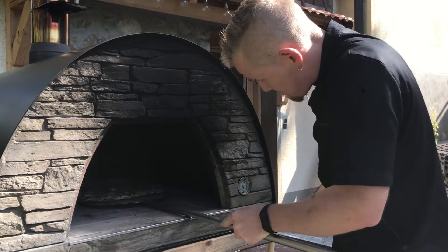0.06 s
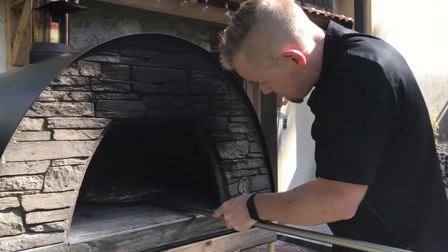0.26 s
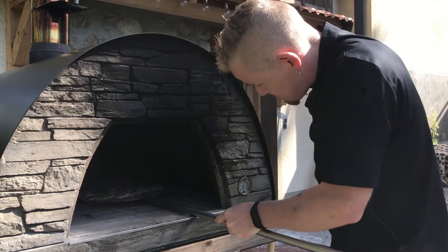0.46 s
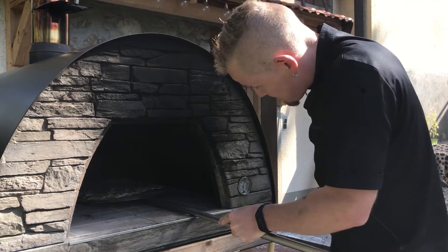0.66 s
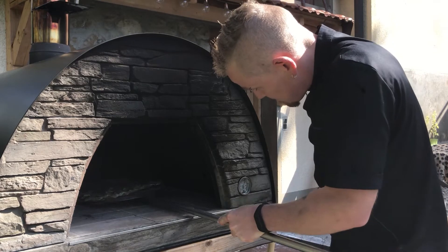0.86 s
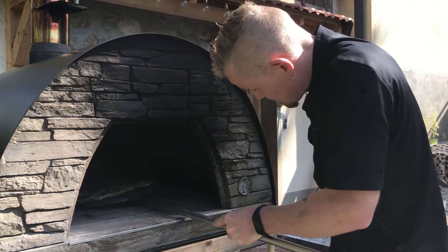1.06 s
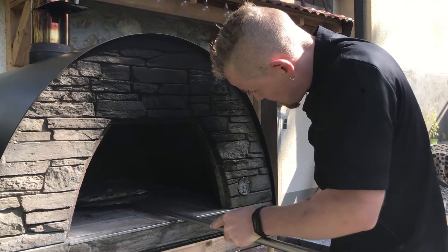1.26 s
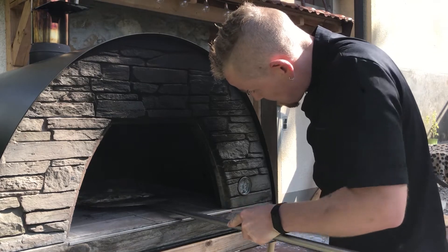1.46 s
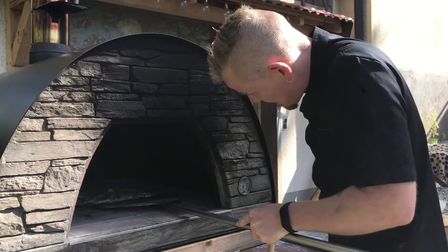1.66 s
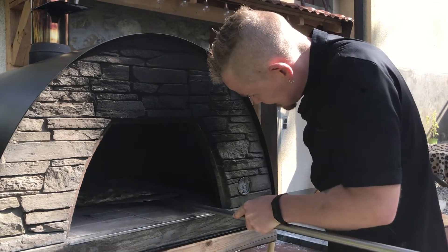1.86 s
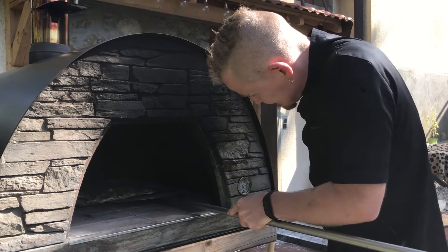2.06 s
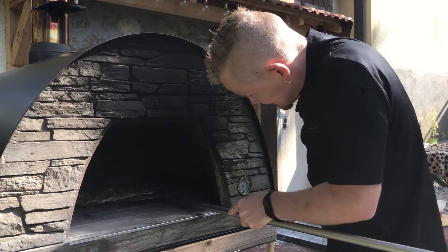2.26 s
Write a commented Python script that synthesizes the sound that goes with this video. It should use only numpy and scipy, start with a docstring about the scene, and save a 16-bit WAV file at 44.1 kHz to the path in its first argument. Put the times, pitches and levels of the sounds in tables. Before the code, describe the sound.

A metal peel rasps on the gritty stone floor of a wood-fired oven: one loud short stroke, a near pause, several quick strokes, then a softer slide; close, fairly dry, with faint low hum outdoors.

```python
"""From the start a metal peel rustles on the gritty stone floor of a wood-fired oven, then strokes loudly at 0.25 s.
After a faint rustle come strokes near 1.0, 1.15 and 1.5 s, a softer slide from 1.7 s and a last rustle from 2.1 s.
Dense clicks of grit drive the blade's damped modes; the contact point wanders, so the colour shifts.
From 0.26 s on, single resonances of peel or dome sing out when pushed by noise; a short echo of noise fills the dome.
Throughout, the draught hums, wavering, in two low resonances of the dome, over shaped noise of quiet outdoor air."""
import sys
import numpy as np
from scipy import signal
from scipy.fft import rfft, irfft
from scipy.io import wavfile
from scipy.ndimage import uniform_filter1d

SR = 44100
rng = np.random.default_rng(int(sys.argv[2]) if len(sys.argv) > 2 else 0)


def master_out(mix):
    """Clip the mix to full scale and print it as 16-bit PCM to the path in sys.argv[1]."""
    frames = np.transpose(np.atleast_2d(mix))
    ceiling = np.clip(frames, -1, 1)
    pcm = np.round(ceiling * 32767).astype(np.int16)
    wavfile.write(sys.argv[1], SR, pcm)


N = 103635  # length [samples]
T = np.arange(N) / SR  # time [s]
F = np.maximum(np.arange(N // 2 + 1) * SR / N, 1)  # frequency [Hz], kept above zero for logarithms

# Loudness of the slide, one list per group of strokes or rustle: (time [s], level [dB])
STROKE_LEVELS = [
    [(0, -45), (.014, -49), (.086, -66), (.158, -56.5), (.182, -67.5), (.19, -59)],
    [(.2, -51.5), (.213, -37.5), (.222, -30), (.253, -21), (.275, -25), (.291, -30), (.301, -23.5),
     (.317, -26), (.343, -43.5), (.4, -60)],
    [(.42, -56), (.428, -48), (.44, -52.5), (.472, -56), (.54, -65), (.575, -61.5), (.59, -55.5),
     (.62, -59), (.712, -69), (.892, -69.5), (.93, -66.5)],
    [(.95, -58), (.992, -46.5), (1.004, -34.5), (1.02, -31), (1.045, -31), (1.075, -34.5), (1.11, -45)],
    [(1.118, -37.5), (1.125, -31.5), (1.148, -28.5), (1.162, -33), (1.18, -27.5), (1.211, -31),
     (1.255, -37.5), (1.29, -54.5), (1.33, -67)],
    [(1.37, -55), (1.414, -36), (1.446, -25.5), (1.475, -28.5), (1.5, -25.5), (1.52, -28), (1.545, -28),
     (1.56, -26.5), (1.595, -30.5), (1.625, -32.5), (1.65, -37.5), (1.676, -44)],
    [(1.7, -43), (1.74, -39), (1.75, -37), (1.8, -39), (1.82, -36.5), (1.87, -36.5), (1.895, -35.5),
     (1.94, -37.5), (1.978, -41), (2.02, -36), (2.06, -39), (2.114, -45)],
    [(2.125, -50), (2.145, -64), (2.183, -55.5), (2.227, -66), (2.247, -53.5), (2.289, -42), (2.32, -49),
     (2.335, -51), (2.35, -65)],
]
# Colour of the slide as the contact point wanders:
# (time [s], extra weight under 1 kHz [dB], extra ring near 1.6 kHz [dB], extra treble [dB])
CONTACT_COLOUR = [(0, 5, -9.5, -1), (.07, 7, 8, 0), (.19, 15, 7, 7.5), (.22, -1, -2.5, -1),
                  (.26, -4, -3, 1.5), (.31, 0, 2.5, -1.5), (.38, 6, 2.5, -3.5), (.43, -12, 4.5, 5),
                  (.52, 16, 8, -7.5), (.59, 11, 7, -1.5), (.78, 0, 3.5, -12.5), (.94, 7, 7.5, -3),
                  (1.01, -2, 3, -9), (1.05, -9, 1, -1.5), (1.11, 19.5, 13, 2.5), (1.14, -6, 0, 4.5),
                  (1.24, 3, -0.5, -4), (1.33, 3, 4.5, -2.5), (1.41, 2, -1.5, 8.5), (1.47, 6.5, -4, 5),
                  (1.53, 5, 2.5, 6), (1.62, 10, 10, 5.5), (1.68, 9, 8.5, 1.5), (1.77, -8, 7.5, 6),
                  (1.85, -3, 0, 4), (1.9, -8.5, 1, -3), (2.07, 4.5, 2.5, -2), (2.18, -1, 8.5, -4),
                  (2.29, 11, -1, 5), (2.35, 11, 0, 7)]
# Frequencies between which the colour changes are interpolated: (frequency [Hz])
COLOUR_KNOTS_HZ = [650, 1600, 4000, 10000]
# Mean spectrum of the slide before its colour shifts: (frequency [Hz], relative level [dB])
SCRAPE_SPECTRUM = [(120, -59.5), (200, -17.5), (415, -25), (640, -22.5), (760, -15), (950, -11),
                   (1130, -4.5), (2620, 0), (4000, -0.5), (5700, 2), (6500, -4.5), (9300, 0), (10000, -8.5),
                   (11800, -11.5), (12500, -6), (14000, -9), (15700, -11)]
# Modes of the blade damped by the stone:
# (frequency [Hz], level before a rise with root frequency [dB], 60 dB decay time [s])
BLADE_MODES = [(560, -12, .08), (1087, -10.5, 0.21), (1306, -1, 0.098), (1567, -7.5, .06), (1750, -9, 0.21),
               (2160, 0, 0.033), (2289, 1.5, 0.15), (2596, -17.5, .04), (2800, -5.5, 0.018),
               (3091, -0.5, 0.12), (3583, -8, 0.09), (4160, -4.5, 0.01), (4646, -13, 0.019),
               (5567, -15, 0.045), (7760, -11.5, 0.004), (8796, -9, 0.004)]
# Level of the lower hum over time, random wavering of narrow noise: (time [s], level [dB])
HUM_LOW_LEVELS = [(0.0, -44), (0.05, -56), (0.08, -77), (0.13, -56.5), (0.99, -62.5), (1.05, -48.5),
                  (1.09, -66), (1.12, -53.5), (1.5, -65), (1.56, -50), (1.6, -66), (1.7, -56.5),
                  (1.75, -64), (1.79, -52), (1.83, -56), (2.01, -62), (2.03, -48), (2.26, -68.5),
                  (2.31, -52.5), (2.35, -59)]
# Level of the upper hum over time, wavering of narrow noise: (time [s], level [dB])
HUM_HIGH_LEVELS = [(0.0, -48.5), (0.24, -69), (0.44, -55.5), (0.46, -45), (0.56, -66), (0.61, -46.5),
                   (0.75, -78), (0.84, -54), (0.95, -67.5), (1.14, -49.5), (1.16, -62), (1.23, -42.5),
                   (1.37, -80), (1.42, -49.5), (1.47, -62), (1.54, -44), (1.56, -63), (1.7, -47.5),
                   (1.72, -59), (1.98, -58), (2.01, -82), (2.04, -42), (2.06, -38), (2.17, -67),
                   (2.26, -43.5), (2.35, -50.5)]
# Spectrum of the outdoor floor: (frequency [Hz], relative level [dB])
AIR_SPECTRUM = [(40, -42), (70, -21.5), (100, -3), (135, -12.5), (208, -14), (330, -18.5), (470, -22.5),
                (800, -32), (2000, -34.5), (4000, -56), (8000, -57), (10500, -66), (13000, -44),
                (15700, -61)]
# Slow rise and dip of the outdoor floor: (time [s], level change [dB])
AIR_SWELL = [(0, 0), (.6, 3.5), (.74, -4.5), (.9, 0), (1.8, 3), (2.35, 1)]
# Resonances of peel or dome that sing out:
# (time [s], length of the push [s], peak level [dB], frequency [Hz], 60 dB decay time [s])
KNOCKS = [(.26, 0.016, -27.5, 2880, 0.034), (0.301, 0.013, -38.5, 867, 0.051),
          (.312, 0.016, -41.5, 530, 0.067), (1.49, 0.037, -38, 790, 0.037), (.31, 0.0093, -45.5, 259, 0.13),
          (0.434, .007, -44.5, 1255, 0.096), (.452, 0.0063, -53, 1370, 0.07),
          (.46, 0.014, -51.5, 312, 0.049), (.515, 0.026, -53.5, 800, 0.032), (.53, 0.03, -56.5, 567, 0.027),
          (.545, 0.023, -50, 376, 0.099), (.965, .015, -51, 1680, .03), (1.051, 0.033, -26, 5600, 0.016),
          (1.06, 0.032, -44, 2740, 0.049), (1.14, 0.013, -29, 1496, 0.041),
          (1.15, 0.016, -25.5, 2620, 0.055), (1.148, 0.011, -20.5, 3520, 0.012),
          (1.467, 0.0082, -26.5, 1303, 0.03), (1.566, 0.011, -31.5, 1184, 0.027),
          (1.59, 0.019, -45, 500, 0.055), (1.59, 0.021, -47, 248, 0.13), (1.618, 0.01, -31.5, 1097, 0.13),
          (1.63, 0.029, -28, 2114, .05), (1.754, 0.0068, -32.5, 1760, 0.11),
          (1.83, 0.029, -38.5, 1700, .07), (1.78, 0.018, -31.5, 2250, 0.046),
          (1.894, 0.026, -34.5, 1705, 0.043), (2.29, 0.023, -51, 1136, 0.054)]

GRAINS_PER_S, GRAIN_SCATTER_DB = 12000., 2  # scatter: mean excess of a grain's level
JUDDER_DB, JUDDER_PER_S = 0.27, 70.  # level spread; fresh levels per second
WANDER_DB, WANDER_PER_S = 4., 22.  # the same, for the drive of each mode
PATCHY_DB, PATCHY_PER_S = 1, 20.  # the same, for each half-octave band
BLADE_DB = -20.5  # all blade modes, beside direct grit at 0 dB
SHEET_LOW_HZ, SHEET_HIGH_HZ = 2477, 15090
SHEET_T60_S, SHEET_DB = 0.033, -19.5  # decay up to 6 kHz, shorter above; level beside direct grit
HUM_LOW_HZ, HUM_LOW_WIDTH_HZ = 107, 8  # width of one pass
HUM_HIGH_HZ, HUM_HIGH_WIDTH_HZ = 167.2, 19
AIR_DB = -59  # before the slow swell
DOME_T60_S, DOME_DB = .16, -22
BOTTOM_HZ, TOP_HZ = 66, 15830


def undb(db):
    """Amplitude ratio by the definition of the decibel."""
    return 10 ** (np.asarray(db) / 20)


def unit(x):
    """Normalisation to a root-mean-square value of 1."""
    return x / np.sqrt(np.mean(x ** 2))


def curve(rows, column=1):
    """Linear interpolation in time of one column of a table."""
    rows = np.array(rows)
    return np.interp(T, rows[:, 0], rows[:, column])


def walk(rate):
    """Smoothed random levels: held 1 / rate s, slewed by two moving averages, spread near 1."""
    hold = int(SR / rate)
    steps = np.repeat(rng.standard_normal(N // hold + 1), hold)
    return 1.47 * uniform_filter1d(uniform_filter1d(steps, hold), hold)[:N]


def colour(x, spectrum):
    """Linear filtering by a spectrum interpolated over log frequency; rms 1."""
    hz, db = np.array(spectrum).T
    gain = undb(np.interp(np.log(F), np.log(hz), db, left=-90))
    return unit(irfft(rfft(x) * gain, N))


def ring(x, hz, t60):
    """Damped resonance: one complex pole gives a sinusoid with exponential decay."""
    pole = np.exp(2j * np.pi * hz / SR - np.log(1000) / (t60 * SR))
    return signal.lfilter([1], [1, -pole], x).imag


def grit():
    """Random impulse excitation: uneven grains click, with a level judder for stick and slip."""
    chance, sign, size = rng.random((3, N))
    hits = (chance < GRAINS_PER_S / SR) * np.sign(sign - .5)
    clicks = hits * undb(-GRAIN_SCATTER_DB * np.log(size + 1e-4))
    return unit(clicks) * undb(JUDDER_DB * walk(JUDDER_PER_S))


def wandering_mode(grains, hz, t60):
    """Modal excitation varies with position: the drive of one mode drifts with the contact point."""
    return unit(ring(grains * undb(WANDER_DB * walk(WANDER_PER_S)), hz, t60))


def blade(grains):
    """Modal superposition: the blade's stone-damped modes add, each driven by the grit."""
    return sum(undb(db) * np.sqrt(hz / 2000) * wandering_mode(grains, hz, t60)
               for hz, db, t60 in BLADE_MODES)


def sheet(grains, count=70):
    """High modal density: a crowd of close sheet modes rings at chance pitches."""
    places = (np.arange(count) + rng.random(count)) / count
    pitches = SHEET_LOW_HZ + (SHEET_HIGH_HZ - SHEET_LOW_HZ) * places
    return sum(wandering_mode(grains, hz, SHEET_T60_S * min(1, 6000 / hz)) for hz in pitches)


def peel():
    """Friction sound: grit radiates directly and through modes, in bands that follow the contact."""
    grains = grit()
    low, body, treble = (curve(CONTACT_COLOUR, column) for column in (1, 2, 3))
    rough = grains + undb(BLADE_DB) * blade(grains) + undb(SHEET_DB) * sheet(grains)
    spectrum = rfft(colour(rough, SCRAPE_SPECTRUM))
    slide = np.zeros(N)
    for hz in 200 * 2 ** (np.arange(14) / 2):  # half-octave steps
        # triangular in log frequency, so neighbouring bands overlap
        band = irfft(spectrum * np.clip(1 - 2 * np.abs(np.log2(F / hz)), 0, 1), N)
        # share of each knot in this band; the 4 kHz knot stays unchanged
        share = [np.interp(np.log(hz), np.log(COLOUR_KNOTS_HZ), knot) for knot in np.eye(4)]
        shift_db = share[0] * low + share[1] * body + share[3] * treble
        slide += band * undb(shift_db + PATCHY_DB * walk(PATCHY_PER_S))
    return slide * undb(curve(np.vstack(STROKE_LEVELS)))


def dome_resonance(hz, width_hz):
    """Resonant filtering: draught noise passes one resonance twice; its own swings are reduced."""
    t60 = np.log(1000) / (np.pi * width_hz)  # bandwidth sets the decay
    noise = ring(ring(rng.standard_normal(N), hz, t60), hz, t60)
    envelope = np.sqrt(uniform_filter1d(noise ** 2, size=2500))
    return unit(noise / np.sqrt(envelope + 1e-9))  # the root halves the swings in dB


def hum():
    """Cavity resonance: the draught hums as narrow noise of wavering level in two dome resonances."""
    lower = undb(curve(HUM_LOW_LEVELS)) * dome_resonance(HUM_LOW_HZ, HUM_LOW_WIDTH_HZ)
    upper = undb(curve(HUM_HIGH_LEVELS)) * dome_resonance(HUM_HIGH_HZ, HUM_HIGH_WIDTH_HZ)
    return lower + upper


def outdoor_air():
    """Shaped broadband noise: the quiet outdoor floor rises and dips slowly."""
    return undb(AIR_DB + curve(AIR_SWELL)) * colour(rng.standard_normal(N), AIR_SPECTRUM)


def dome(x):
    """Reverberation by convolution: the stone dome adds a dense, exponentially decaying echo."""
    t = T[:SR // 3]
    decay = np.exp(-np.log(1000) * t / DOME_T60_S)
    tail = rng.standard_normal(len(t)) * decay * (t > .002)  # echo starts after 2 ms
    tail /= np.sqrt(np.sum(tail ** 2))
    return x + undb(DOME_DB) * signal.fftconvolve(x, tail)[:N]


def knocks():
    """Transient excitation: a rough push, a Gaussian burst of noise, rings one mode."""
    out = np.zeros(N)
    for start, push, db, hz, t60 in KNOCKS:
        burst = rng.standard_normal(N) * np.exp(-((T - start) / push) ** 2)  # push centred on its time
        tone = ring(burst, hz, t60)
        out += undb(db) * tone / np.abs(tone).max()
    return out


def scene():
    """Linear superposition: peel and knocks sound in the dome, with the hum and outdoor air added."""
    return (dome(peel() + knocks()) + hum() + outdoor_air())[None]


def record(dry):
    """Band limiting: the microphone drops the deep bass and the recorder cuts the top."""
    bass_cut = signal.butter(4, BOTTOM_HZ, "high", fs=SR, output="sos")
    top_cut = signal.ellip(14, .2, 80, TOP_HZ, fs=SR, output="sos")  # .2 dB ripple, 80 dB rejection
    return signal.sosfilt(top_cut, signal.sosfilt(bass_cut, dry))


dry = scene()
out = record(dry)
master_out(out)
```